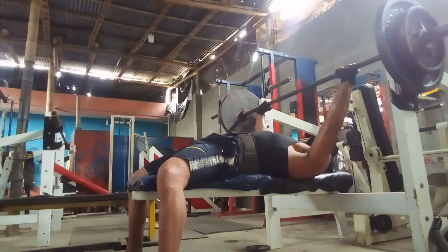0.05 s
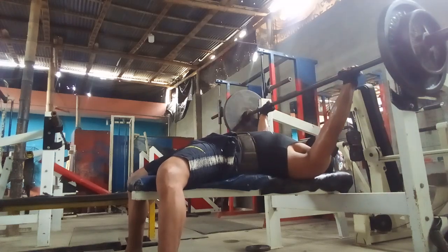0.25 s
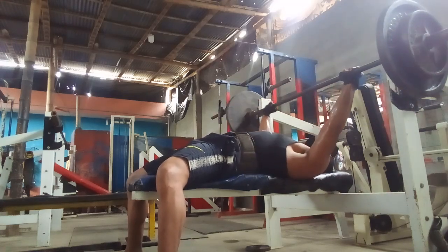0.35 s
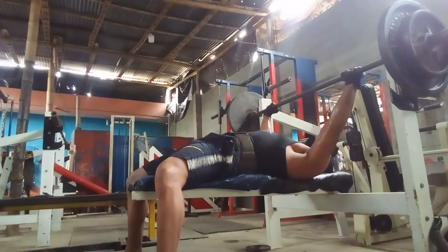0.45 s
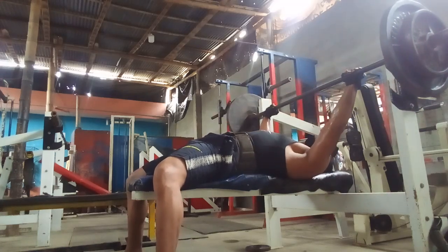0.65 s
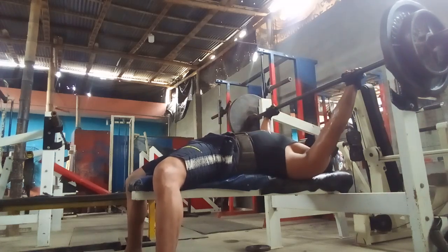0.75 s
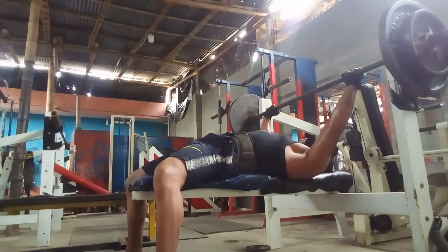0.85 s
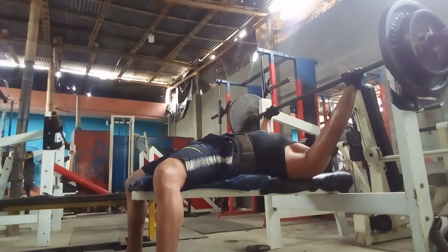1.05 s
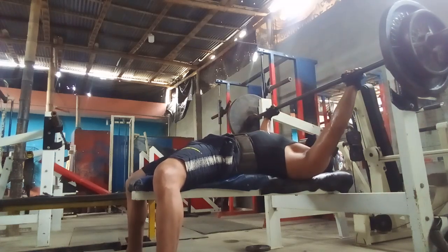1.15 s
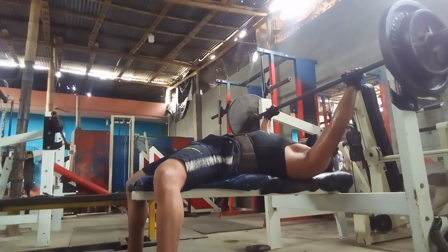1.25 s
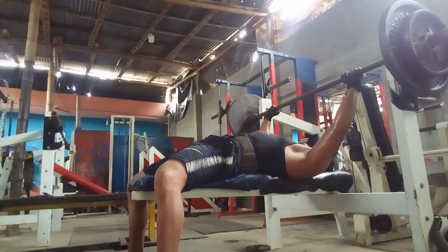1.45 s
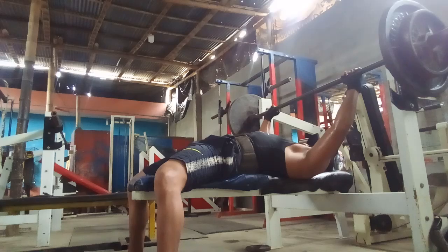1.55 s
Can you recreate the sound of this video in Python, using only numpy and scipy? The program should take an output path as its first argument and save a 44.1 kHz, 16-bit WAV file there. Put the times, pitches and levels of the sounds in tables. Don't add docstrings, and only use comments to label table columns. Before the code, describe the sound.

A loaded barbell clanks against a steel rack in three quick rattling bursts, with low frame thuds and close bar knocks, then a dense echo fades over a faint fan hum in a large metal-roofed gym.

```python
import sys
import numpy as np
from scipy import signal
from scipy.fft import rfft, irfft
from scipy.io import wavfile

SR = 44100
rng = np.random.default_rng(int(sys.argv[2]) if len(sys.argv) > 2 else 0)


def boost(x):
    u = np.asarray(x, float) / 20
    return 10 ** u


def transcribe(signal):
    frames = np.atleast_2d(signal).T
    limited = np.clip(frames, -1, 1)
    pcm = np.round(limited * 32767).astype(np.int16)
    wavfile.write(sys.argv[1], SR, pcm)


N = 70560


def at_hz(points, hz):
    curve = np.array(points)
    return np.interp(np.log(hz + 1), np.log(curve[:, 0]), curve[:, 1])


def rms_one(x):
    return x / np.sqrt(np.mean(x ** 2) + 1e-20)


def ring(clicks, hz, t60):
    radius = boost(-60 / (t60 * SR))
    angle = 2 * np.pi * hz / SR
    feedback = [1, -2 * radius * np.cos(angle), radius ** 2]
    return signal.lfilter([0, np.sin(angle)], feedback, clicks + 1e-18)


def band_pass(x, low_hz, high_hz):
    return signal.sosfilt(signal.butter(2, [low_hz, high_hz], "band", fs=SR, output="sos"), x)


def colour(x, points):
    size = 4096
    hz = np.arange(size // 2 + 1) * SR / size
    cepstrum = irfft(at_hz(points, hz) * np.log(10) / 20)
    cepstrum[1:size // 2] *= 2
    cepstrum[size // 2 + 1:] = 0
    impulse = irfft(np.exp(rfft(cepstrum)))
    return signal.fftconvolve(x, impulse)[:len(x)]


# start_s [s], strength_db [dB], hardness [0-1]
FIRST_HITS = [(.212, -30.5, 0.2), (.216, -18.5, 0.51), (.228, -19.5, 0.79), (.249, -22, 0.37),
              (.270, -16.5, 0.15), (.279, -25.5, 0.69), (.300, -21.5, 0.53), (.325, -19.5, 0.24),
              (.378, -39, 0.23)]
SECOND_HITS = [(.488, -14, 0.49), (.491, -11, 0.41), (.499, -15, .65), (.506, -16, 1), (.517, -19.5, 1),
               (.536, -15, 0.37), (.580, -18.5, 0.78), (.688, -16, 0.3), (.725, -24.5, 0.59),
               (.755, -19, 0.57)]
THIRD_HITS = [(.801, -20, 0.68), (.812, -20, 0.98), (.820, -17.5, 0.71), (.835, -16.5, 0.46),
              (.858, -21, 0.46)]
# pitch_hz [Hz], level_db [dB], t60_s [s]
FIRST_IRON = [(586, -13.5, 0.75), (850, -3.5, 0.052), (1315, -8, 0.067), (1480, -24, 0.1),
              (1577, -4.5, 0.046), (1780, -8.5, .1), (1838, 1.5, 0.11), (13700, -6.5, .012),
              (2520, -42.5, 0.073), (4020, -8, 0.072), (4860, -33.5, 0.01), (6050, -30, .01),
              (10500, 7, 0.0084), (11100, -5, .008)]
SECOND_IRON = [(623, -30, 0.87), (842, -14.5, 0.3), (1088, -6.5, 0.053), (1215, -15.5, 0.33),
               (1336, -5.5, 0.075), (1464, -5, 0.032), (1656, -4.5, 0.085), (1987, -17, 0.11),
               (2340, -11, 0.22), (4190, 3, 0.015), (6090, 4, 0.0069), (9780, -3, 0.041), (10570, -5, 0.06),
               (12460, -9, .08)]
THIRD_IRON = [(1254, -7.5, 0.11), (1435, -3.5, 0.093), (1622, -12, 0.13), (1570, -28, 0.066),
              (1693, -12, .06), (1744, -4, 0.052), (2430, -10, .02), (3280, -15.5, 0.17),
              (4300, -1.5, 0.028), (5590, -5.5, 0.045), (6270, -1, 0.0077), (7515, -10, 0.053),
              (9400, -4.5, 0.04), (12460, -17, 0.055)]
# pitch_hz [Hz], level_db [dB]
RACK_VOICE = [(150, -14.5), (400, 1.5), (800, -0.5), (1500, 10), (2500, 3), (3500, 1.5), (4400, 0.5),
              (5100, -4)]
CRACK_DB, CRACK_DECAY_S, CRACK_RISE_S = 9.5, 0.0044, 0.0009
RING_DB, MODE_SPREAD_DB = -6.5, 1.5
TWIN_SPLIT = 0.0097


def clank(hits, iron):
    t = np.arange(SR // 20) / SR
    crack_shape = np.exp(-t / CRACK_DECAY_S) * (1 - np.exp(-t / CRACK_RISE_S))
    mode_hz = np.array(iron)[:, :1]
    crack = np.zeros(N)
    kicks = np.zeros((len(iron), 2, N))
    for start_s, strength_db, hardness in hits:
        i = int(start_s * SR)
        cut_hz = 1000 * 16 ** hardness
        burst = rng.standard_normal(len(t)) * crack_shape
        soften = signal.butter(2, min(cut_hz, 0.45 * SR), fs=SR, output="sos")
        crack[i:i + len(t)] += boost(strength_db + CRACK_DB) * signal.sosfilt(soften, burst)
        spread_db = MODE_SPREAD_DB * rng.standard_normal((len(iron), 2))
        sign = rng.choice([-1, 1], spread_db.shape)
        softness = np.sqrt(1 + (mode_hz / cut_hz) ** 4)
        kicks[:, :, i] = boost(strength_db + RING_DB + spread_db) * sign / softness
    ringing = np.zeros(N)
    for (kick, twin_kick), (hz, level_db, t60_s) in zip(kicks, iron):
        pair = ring(kick, hz, t60_s) + ring(twin_kick, hz * (1 + TWIN_SPLIT), t60_s)
        ringing += boost(level_db) * pair
    return ringing + colour(crack, RACK_VOICE)


# start_s [s], level_db [dB], pitch_hz [Hz], t60_s [s]
HOOK_KNOCKS = [
    (0.25, -8.5, 1790, 0.04),
    (0.4904, -4, 1330, 0.033),
    (.531, -5, 1540, 0.046),
    (0.8038, -6.5, 1449, 0.068),
    (.817, -11, 1456, 0.044),
    (.835, -9.5, 1462, 0.051),
]


def knocks():
    out = np.zeros(N)
    for start_s, level_db, hz, t60_s in HOOK_KNOCKS:
        push = np.zeros(N)
        push[int(start_s * SR)] = boost(level_db)
        out += ring(push, hz, t60_s)
    rise_hz = 900
    return band_pass(out, rise_hz, 2.15 * rise_hz)


# start_s [s], level_db [dB], pitch_hz [Hz]
FLOOR_THUDS = [
    (0.214, -7.5, 205),
    (0.272, -10, 134),
    (0.4, -14, 152),
    (0.504, -10, 273),
    (0.569, -14.5, 134),
    (.698, -6, 232),
    (0.861, -12, 202),
    (1.205, -49, 147),
]
THUD_CYCLES = 4.53


def thuds():
    out = np.zeros(N)
    for start_s, level_db, hz in FLOOR_THUDS:
        push = np.zeros(N)
        push[int(start_s * SR)] = -boost(level_db)
        out += ring(push, hz, THUD_CYCLES / hz)
    return band_pass(out, 103, 450)


# pitch_hz [Hz], t60_s [s]
HALL_DECAY = [(150, 1.23), (400, 1.29), (1000, 1.14), (2700, 0.98), (7000, 0.72), (14000, 0.66)]
HALL_BUILD_S = 0.004


def hall(x):
    t = np.arange(N) / SR
    hz = np.arange(N // 2 + 1) * SR / N
    spectrum = rfft(rng.standard_normal(N))
    edges_hz = 40 * 2 ** np.arange(0, 9.1, 0.25)
    tail = np.zeros(N)
    for low, high in zip(edges_hz, edges_hz[1:]):
        band = irfft(spectrum * ((hz >= low) & (hz < high)), N)
        tail += band * boost(-60 * t / at_hz(HALL_DECAY, np.sqrt(low * high)))
    tail *= 1 - np.exp(-t / HALL_BUILD_S)
    return signal.fftconvolve(x, tail / np.sqrt(np.sum(tail ** 2)))[:N]


def narrow(centre_hz, width_hz):
    hz = np.arange(N // 2 + 1) * SR / N
    resonance = 1 / (1 + (2 * (hz - centre_hz) / width_hz) ** 2)
    return rms_one(irfft(rfft(rng.standard_normal(N)) * resonance, N))


# pitch_hz [Hz], level_db [dB]
AIR_COLOUR = [(25, -34.5), (100, 4.5), (150, -6), (230, -5.5), (1000, -18), (2500, -27), (6000, -40),
              (12000, -40)]
# pitch_hz [Hz], width_hz [Hz], level_db [dB]
FAN_HUM = [(112.3, 5.6, -46.5), (141.4, 12.6, -37.5), (156.5, 8.4, -33.5), (522, 7.5, -56)]
# time_s [s], level_db [dB]
HUM_SWELL = [(0, 0.5), (.2, -0.5), (.42, 3), (.7, 0), (.9, 3.5), (1.1, -1.5), (1.3, -5), (1.45, -3.5),
             (1.6, -8)]
# pitch_hz [Hz], width_hz [Hz], level_db at the start [dB]
EARLIER_RING = [(874, 110, -50), (1330, 180, -47.5), (2460, 150, -52.5), (5180, 1100, -61.5)]
AIR_DB, EARLIER_T60_S = -37, 5.1


def room_tone():
    t = np.arange(N) / SR
    hz = np.arange(N // 2 + 1) * SR / N
    air = rms_one(irfft(rfft(rng.standard_normal(N)) * boost(at_hz(AIR_COLOUR, hz)), N))
    drone = sum(boost(db) * narrow(centre_hz, width_hz) for centre_hz, width_hz, db in FAN_HUM)
    earlier = sum(boost(db) * narrow(centre_hz, width_hz) for centre_hz, width_hz, db in EARLIER_RING)
    swell = boost(np.interp(t, *np.transpose(HUM_SWELL)))
    return boost(AIR_DB) * air + drone * swell + earlier * boost(-60 * t / EARLIER_T60_S)


CLANK_HALL_DB = [-2, -1.04, -2]
HALL_DB, THUD_HALL_DB = 5, -5.5


def scene():
    clanks = [clank(FIRST_HITS, FIRST_IRON), clank(SECOND_HITS, SECOND_IRON), clank(THIRD_HITS, THIRD_IRON)]
    mix = np.zeros(N)
    for iron, hall_db in zip(clanks, CLANK_HALL_DB):
        mix += iron + boost(HALL_DB + hall_db) * hall(iron)
    floor = thuds()
    mix += knocks() + floor + boost(HALL_DB + THUD_HALL_DB) * hall(floor)
    return (mix + room_tone())[None]


def low_pass(x):
    return signal.sosfilt(signal.butter(12, 15650, fs=SR, output="sos"), x)


# pitch_hz [Hz], level_db [dB]
MIC_COLOUR = [(5000, 0.5), (6000, 5), (6700, -3.5), (7600, -10), (9000, -18), (11000, -14.5), (14000, -19),
              (15500, -18)]
MIC_LOW_HZ, PEAK_LIMIT = 41.8, 1.6


def record(dry):
    heard = colour(dry[0], MIC_COLOUR)[None]
    rounded = PEAK_LIMIT * np.tanh(heard / PEAK_LIMIT)
    bass_cut = signal.butter(1, MIC_LOW_HZ, "high", fs=SR, output="sos")
    mix = signal.sosfilt(bass_cut, rounded)
    return low_pass(mix)


dry = scene()
out = record(dry)
transcribe(out)
```